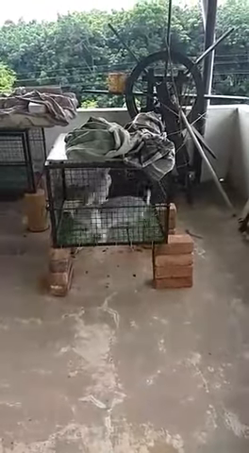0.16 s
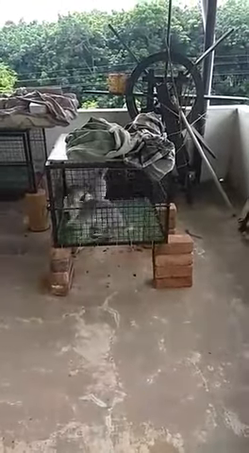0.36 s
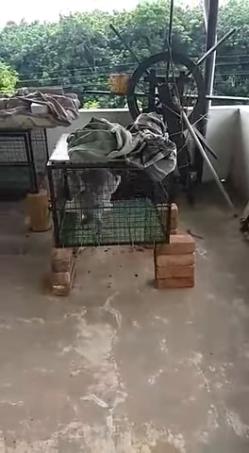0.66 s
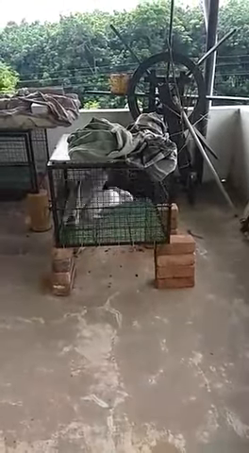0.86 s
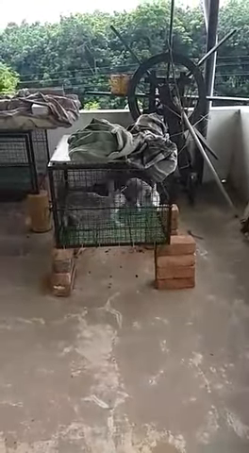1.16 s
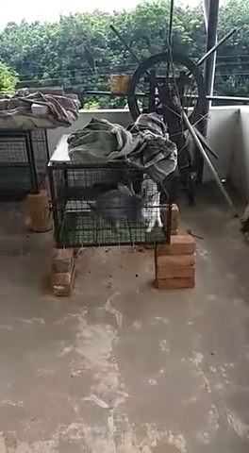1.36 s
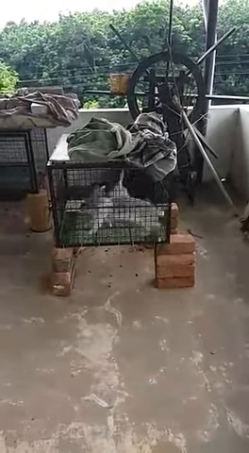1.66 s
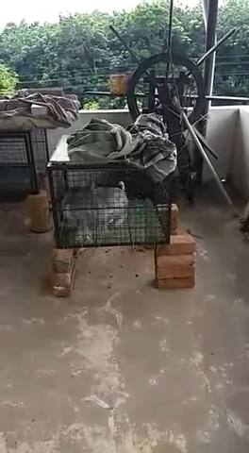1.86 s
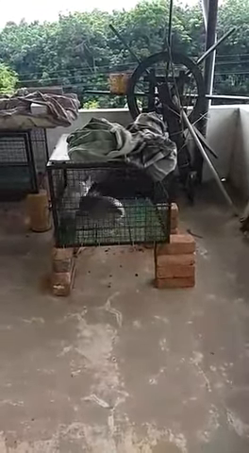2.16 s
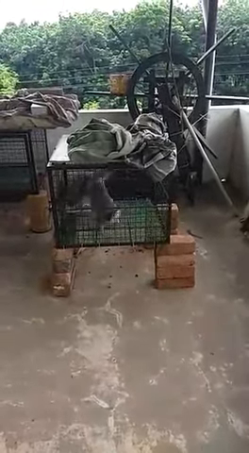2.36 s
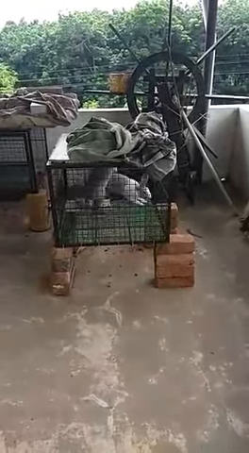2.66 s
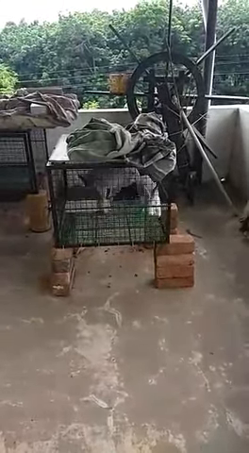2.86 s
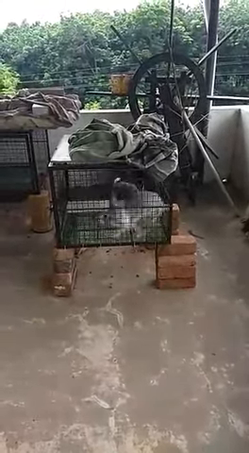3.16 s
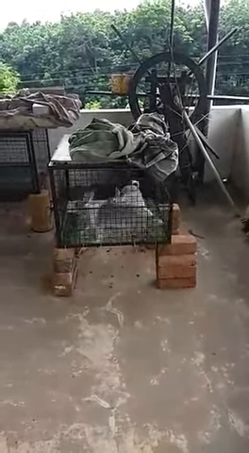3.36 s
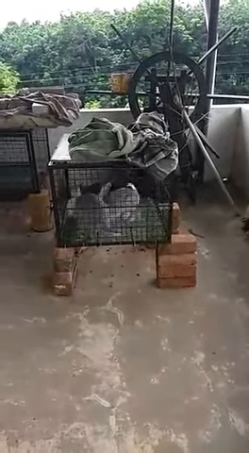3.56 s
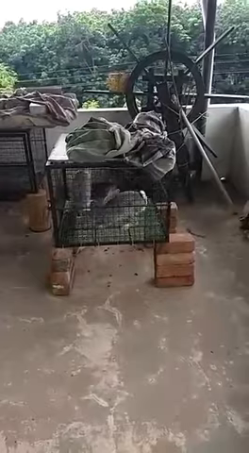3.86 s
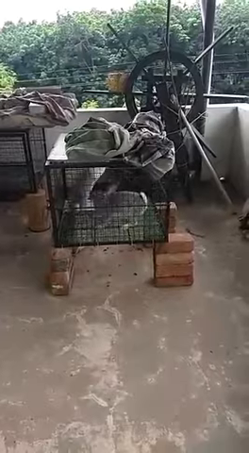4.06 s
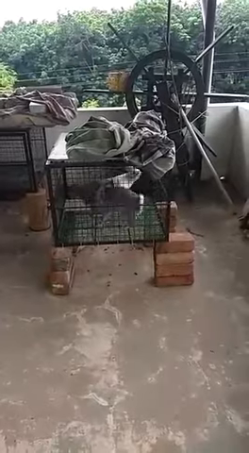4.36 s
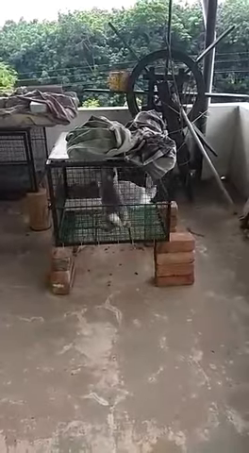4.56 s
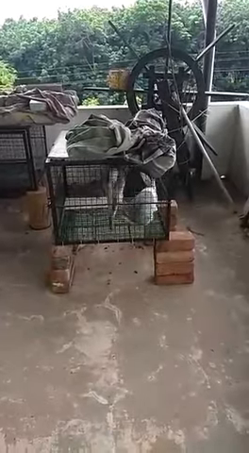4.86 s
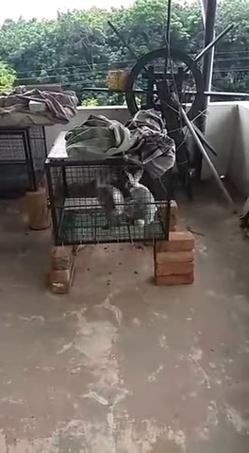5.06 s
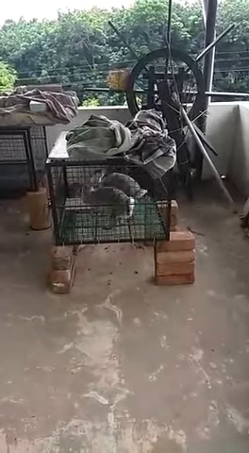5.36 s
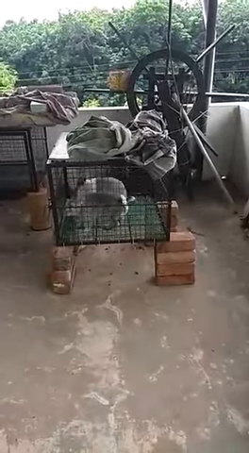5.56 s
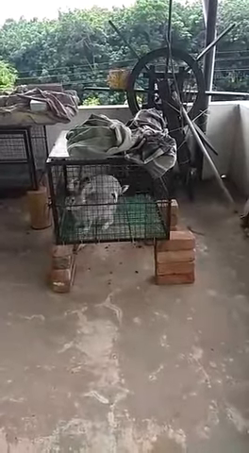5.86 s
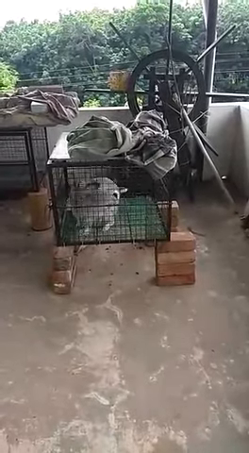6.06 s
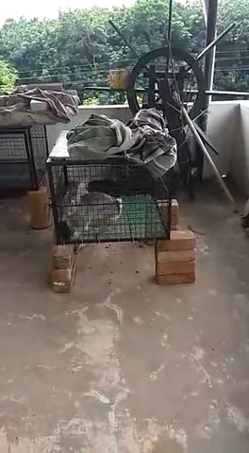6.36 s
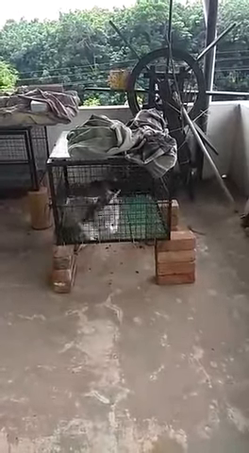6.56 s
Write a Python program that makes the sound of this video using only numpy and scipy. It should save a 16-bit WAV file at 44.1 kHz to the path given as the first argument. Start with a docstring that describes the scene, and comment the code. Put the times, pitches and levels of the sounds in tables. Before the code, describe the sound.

Fur brushes and claws scratch against wire as two rabbits tussle in a mesh cage. A sharp metallic crash comes about a second in and a louder one near three seconds, followed by smaller rattles, bright ticks and dull foot thumps. The microphone picks up a short echo from the roofed terrace, along with a soft outdoor hiss, a slow faraway engine and a faint tone that swells twice.

```python
"""On a roofed terrace, two rabbits scuffle in a wire mesh cage. Their bodies slam into the mesh, so it rattles
and its wires and frame ring. Claws tick and scratch on the wires, fur brushes past, and feet thump on the floor
grid. Floor, walls and roof echo it all. Behind it the open air hisses, a slow engine drones far off, and a
faint high hum of that engine swells twice."""
import sys
import numpy as np
from scipy import signal
from scipy.fft import rfft, irfft, next_fast_len
from scipy.io import wavfile
from scipy.ndimage import uniform_filter1d

SR = 44100
rng = np.random.default_rng(int(sys.argv[2]) if len(sys.argv) > 2 else 0)


def log_audio(samples):
    """Write samples as a 16-bit WAV file to the path given in sys.argv[1]."""
    # one column per channel
    frames = np.atleast_2d(samples).T
    # limit to full scale, then quantise
    limited = np.clip(frames, -1, 1)
    pcm = np.round(limited * 32767).astype(np.int16)
    wavfile.write(sys.argv[1], SR, pcm)


N = 295468
TOP_HZ = 13180  # the sound is cut off above this pitch
LEFT_LAG = 8  # samples by which the cage's sound reaches the left side later


def amp(db):
    """Turns decibels into a gain."""
    return 10 ** (np.asarray(db) / 20)


def unit(x):
    """Scales a sound to an average (rms) level of 1."""
    return x / np.sqrt(np.mean(x ** 2) + 1e-20)


def unit_energy(x):
    """Scales each channel to an energy of 1."""
    return x / np.linalg.norm(x, axis=-1, keepdims=True)


def levelled(sound, db, length):
    """Sets the average level of the first `length` seconds (at least 3 ms)."""
    return amp(db) * sound / np.sqrt(np.mean(sound[:, :int(max(length, .003) * SR)] ** 2))


def at_pitch(table, hz):
    """Looks up a pitch in a table, gliding between its rows."""
    f, value = np.transpose(table)
    return np.interp(np.log(hz + 1), np.log(f + 1), value)


def curves(table):
    """Turns each column of a time table into a value for every sample."""
    times, *columns = np.transpose(table)
    return [np.interp(np.arange(N) / SR, times, column) for column in columns]


def add(mix, start, sound):
    """Mixes in a stereo sound at `start` seconds."""
    part = mix[:, round(start * SR):][:, :sound.shape[1]]
    part += sound[:, :part.shape[1]]


def colour(x, db_at):
    """Turns each pitch up or down by db_at(hz) decibels."""
    size = next_fast_len(x.shape[-1] + 2048)
    gain = amp(db_at(np.fft.rfftfreq(size, 1 / SR) + 1))
    return irfft(rfft(x, size) * gain, size)[..., :x.shape[-1]]


def drift(top_hz):
    """A slow random wobble of average size 1."""
    t = np.arange(N // 256 + 2) * 256 / SR
    rates = np.geomspace(top_hz / 10, top_hz, 20)
    wobble = sum(np.sin(2 * np.pi * (f * t + rng.random())) / np.sqrt(f) for f in rates)
    return np.interp(np.arange(N) / SR, t, unit(wobble))


def dying_noise(ring_times):
    """Stereo noise in which each pitch has its own ring time (t60: the time to fade by 60 dB)."""
    hz, t, bands = signal.stft(rng.standard_normal((2, SR * 2 // 3)), SR, nperseg=256)
    fade = np.exp(-np.log(1000) * t / at_pitch(ring_times, hz)[:, None])
    return signal.istft(bands * fade, SR, nperseg=256)[1][:, :SR // 2]


def dying_tone(hz, t60, phase_turns=0):
    """One fading note of a struck object."""
    t = np.arange(SR // 2) / SR
    return unit_energy(np.exp(-np.log(1000) * t / t60) * np.sin(2 * np.pi * (hz * t + phase_turns)))


def snap():
    """A bare click straight from the cage, reaching the right side first."""
    click = np.zeros((2, SR // 2))
    click[0, LEFT_LAG] = click[1, 0] = 1
    return click


def contacts(length, per_s, spread_db, fade_power, first=0.082, rise_share=0.014):
    """A first touch, then a run of small uneven knocks that builds up and dies."""
    t = np.arange(int(2 * max(length, .002) * SR)) / SR
    chance, size, sign = rng.random((3, SR // 2))[:, :len(t)]
    clicks = (chance < per_s / SR) * amp(spread_db * (size - 3.0)) * np.sign(sign - .5)
    clicks *= 1 - np.exp(-t / (rise_share * length))
    clicks[0] = first
    return (clicks * np.exp(-(t / length) ** fade_power))[None]


def close_echoes(x, echo_db, count=5):
    """Close surfaces echo within 1 to 9 ms, giving each spot its own tone colour."""
    echoes = np.zeros((2, SR // 80))
    for delay, offset, sign in rng.random((count, 3)):
        left = int((.001 + .008 * delay) * SR)
        right = left + int(4 * offset)
        echoes[[0, 1], [left, right]] += np.sign(sign - .5) * amp(echo_db) / np.sqrt(count)
    echoes[:, 0] = 1
    return signal.oaconvolve(x, unit_energy(echoes), axes=1)[:, :x.shape[1]]


# tone colour of the open air: f/Hz, level/dB
AIR_COLOUR = [(15, -45), (30, -16), (60, -13), (95, -15.5), (130, 6.5), (220, 2), (310, 1.5), (385, 1.5),
              (470, -5), (750, -4.5), (2400, -5.5), (5500, -10), (9000, -9), (13000, -17.5)]
# how alike left and right are: f/Hz, likeness (1 = the same)
AIR_LIKENESS = [(100, 0.99), (300, 0.86), (600, 0.53), (1200, -0.29), (2500, -0.065), (5000, -0.11),
                (12000, 0.027)]
# how the air rises and ebbs, before the trims below: t/s, roar level/dB, hiss level/dB
AIR_LEVELS = [(0, -46, -31.5), (.6, -44, -37), (2.2, -41.5, -36.5), (3.7, -45, -41), (5.8, -45, -42),
              (6.7, -42.5, -44.5)]
def air(split_hz=1100, roar_trim_db=-1, hiss_trim_db=-3):
    """Open air: a low roar much alike on both sides, and a wide hiss that bounces off the walls."""
    left, other = rfft(rng.standard_normal((2, N)))
    hz = np.fft.rfftfreq(N, 1 / SR)
    likeness = np.clip(at_pitch(AIR_LIKENESS, hz), -1, 1)
    right = likeness * left + np.sqrt(1 - likeness ** 2) * other
    spectrum = np.array([left, right]) * amp(at_pitch(AIR_COLOUR, hz)) * (hz < TOP_HZ)
    low_share = 1 / (1 + (hz / split_hz) ** 4)
    roar, hiss = (unit(irfft(spectrum * np.sqrt(share), N)) for share in (low_share, 1 - low_share))
    hiss = unit(close_echoes(hiss, echo_db=-5))
    roar_db, hiss_db = curves(AIR_LEVELS)
    return roar * amp(roar_db + roar_trim_db) + hiss * amp(hiss_db + hiss_trim_db)


# swells of the distant tone: t/s, length/s, peak level/dB
TONE_SWELLS = [(3.997, 0.45, -46), (6.24, 0.39, -47)]
def far_tone(hz=382, waver=0.035):
    """A faint, slightly unsteady high hum of the far engine."""
    t = np.arange(N) / SR
    swell = sum(amp(db) * np.sin(np.pi * np.clip((t - start) / length, 0, 1))
                for start, length, db in TONE_SWELLS)
    pitch = hz * (1 + waver * drift(26))
    return swell * np.sin(2 * np.pi * np.cumsum(pitch) / SR)


# how often the engine fires: t/s, f/Hz
FIRING_RATE = [(0, 21.1), (.4, 20.2), (1, 20.2), (1.6, 19), (2.4, 23.1), (3.4, 18.8), (4.6, 19.55),
               (5.6, 24), (6.7, 22.6)]
# its main hums, at 7 and 8 times that rate: t/s, level/dB of the first, level/dB of the second
MAIN_HUMS = [(0, -40.5, -39), (.27, -43, -39.5), (.55, -45.5, -56), (1.4, -48.5, -53), (2.1, -66, -47),
             (3.5, -57, -51), (4.8, -47, -77), (6.7, -77, -59)]
# its weak hums: multiple of the firing rate -> level/dB relative to the louder main hum
WEAK_HUMS = {5: -21, 6: -28, 10: -8, 11: -32, 14: -26, 15: -18.5, 19: -14.5}
def engine(puff_db=-7, puff_band_hz=(86.3, 207.4), puff_fade_cycles=0.13):
    """A slow, far engine: its hums swell and fade on their way, and each firing gives a dull puff."""
    cycles = np.cumsum(curves(FIRING_RATE)[0]) / SR + rng.random()
    def hum(multiple, db):
        return amp(db) * np.sqrt(2) * np.sin(2 * np.pi * (multiple * cycles + 0.055 * drift(8.9)))
    levels = curves(MAIN_HUMS)
    strong = sum(hum(multiple, db) for multiple, db in zip((7, 8), levels))
    loudest_db = np.max(levels, axis=0)
    weak = sum(hum(multiple, loudest_db + db + 2.5 * drift(3)) for multiple, db in WEAK_HUMS.items())
    puffs = rng.standard_normal(N) * np.exp(-(cycles % 1) / puff_fade_cycles)
    puffs = unit(signal.sosfilt(signal.butter(1, puff_band_hz, "band", fs=SR, output="sos"), puffs))
    return strong + weak + puffs * amp(loudest_db + puff_db)


# how long the terrace echoes: f/Hz, ring time/s
TERRACE_ECHO = [(200, 0.83), (2000, 0.54), (6000, 0.6), (13000, 0.48)]
def terrace(x, echo_db=-10.5, build_s=0.041):
    """Floor, walls and roof throw the cage's noise back."""
    t = np.arange(SR // 2) / SR
    echo = dying_noise(TERRACE_ECHO) * (1 - np.exp(-(t / build_s) ** 2))
    return x + amp(echo_db) * signal.fftconvolve(x, unit_energy(echo), axes=1)[:, :N]


def spot_ring(count=70, t60=.045, band_hz=(2300, 13100)):
    """The short wires around a touched spot ring briefly, each at its own random pitch."""
    size = SR // 7
    spectrum = np.zeros((2, size // 2 + 1), complex)
    bins = (rng.uniform(*band_hz, count) * size / SR).astype(int)
    spectrum[:, bins] = rng.uniform(.3, 1, count) * np.exp(2j * np.pi * rng.random((2, count)))
    fade = np.exp(-np.log(1000) * np.arange(size) / SR / t60)
    return unit_energy(irfft(spectrum, size) * fade)


def rub_wire(slips, snap_db, echo_db):
    """Each slip on a wire gives a snap and a short ring, echoed by close surfaces."""
    ring = spot_ring()
    touch = ring + amp(snap_db) * snap()[:, :ring.shape[1]]
    return close_echoes(signal.fftconvolve(slips, touch, axes=1), echo_db)


# how loudly fur and paws brush the mesh: t/s, level/dB
BRUSH_LEVEL = [(0, -37), (.6, -38), (1.4, -40.5), (1.85, -42), (2.3, -38), (3.7, -44), (4.6, -42.5),
               (5.7, -44), (6.7, -41.5)]
def brushing(count=120, low_cut_hz=1600):
    """Fur and paws keep brushing the mesh in faint dry scuffs, each at another spot."""
    out = np.zeros((2, N))
    for k, (when, span, softness) in enumerate(rng.random((count, 3))):
        length = .025 + .07 * span
        slips = contacts(length, per_s=500, spread_db=24, fade_power=4, first=.004, rise_share=.15)
        scuff = rub_wire(slips, snap_db=-2, echo_db=6)
        add(out, (k + when) * N / SR / count, levelled(scuff, -6 * softness, length))
    out = colour(out, lambda hz: -20 * np.log10(1 + (low_cut_hz / hz) ** 2) - 60 * (hz > TOP_HZ))
    return unit(out) * amp(curves(BRUSH_LEVEL)[0])


# notes of the floor grid: f/Hz, level/dB, ring time/s
GRID_NOTES = [(140, 5.5, 0.12), (169, -10, 0.46), (272, 3, 0.84), (351, 6, 0.17), (447, -14, 0.25),
              (690, 0, 0.088), (807, -16, 0.16)]
# feet and rumps landing on it: t/s, level/dB, length/s, f/Hz of the boom
LANDINGS = [(0.835, -34, 0.025, 340), (1.275, -43, 0.057, 355), (1.484, -38, 0.016, 740),
            (1.519, -46.5, 0.036, 150), (1.994, -43, 0.13, 200), (2.753, -25.5, 0.021, 359),
            (2.921, -38.5, 0.13, 320), (4.536, -41, 0.0076, 150), (4.72, -42, 0.1, 275),
            (6.52, -50, 0.02, 162)]
def thumps(thud_db=4, boom_db=9, low_cut_hz=105):
    """Soft feet push the floor grid: a boom, low notes and a thud. The open grid gives no deep bass."""
    thud_band = signal.butter(3, [130, 900], "band", fs=SR, output="sos")
    thud = signal.sosfilt(thud_band, snap() + .5 * unit_energy(dying_noise([(500, 0.3)])))
    grid = sum(amp(db) * dying_tone(hz, t60) for hz, db, t60 in GRID_NOTES)
    grid = grid + amp(thud_db) * unit_energy(thud)
    out = np.zeros((2, N))
    for start, db, length, hz in LANDINGS:
        floor = grid + amp(boom_db) * dying_tone(hz, t60=0.07)
        pushes = contacts(length, per_s=1000, spread_db=11, fade_power=1.7)
        add(out, start, levelled(signal.fftconvolve(pushes, floor, axes=1), db, length))
    return signal.sosfilt(signal.butter(4, low_cut_hz, "high", fs=SR, output="sos"), out)


def claw_colour(x, lows_db, centre_hz=12400, width_octaves=0.79):
    """Claw on wire sounds bright: a high band stays, and lower pitches sink towards lows_db."""
    def db_at(hz):
        bump = np.exp(-.5 * (np.log2(hz / centre_hz) / width_octaves) ** 2)
        return lows_db * (1 - bump) - 60 * (hz > TOP_HZ)
    return colour(x, db_at)


# claw tips striking a wire: t/s, level/dB
CLAW_TICKS = [(0.189, -33), (0.452, -39), (0.809, -23), (1.325, -27), (1.41, -31), (1.505, -34),
              (1.546, -26.5), (1.656, -30.5), (1.918, -29), (2.285, -40), (3.02, -24), (4.38, -28),
              (4.52, -29), (4.587, -28), (4.688, -32), (4.831, -38), (4.9637, -20), (5.002, -26),
              (5.085, -32), (5.186, -30), (5.199, -28), (6.254, -40), (6.284, -27), (6.498, -40),
              (6.547, -38), (6.618, -35), (6.683, -38)]
def ticks():
    """A claw tip hits one wire: a tiny burst of noise and a small clink."""
    out = np.zeros((2, N))
    for start, db in CLAW_TICKS:
        tick = unit_energy(dying_noise([(1000, .015)]))
        add(tick, 0, .5 * spot_ring(count=24, t60=0.14))
        add(out, start, levelled(claw_colour(tick, lows_db=-22), db, length=.003))
    return out


# claws dragged along the wires: t/s, level/dB, length/s, level/dB of the lows against the highs
CLAW_STROKES = [(0.367, -35, 0.039, -4), (0.738, -36, 0.019, -26), (0.805, -23.5, 0.06, -10.5),
                (1.128, -32.5, 0.071, -2), (1.324, -34, 0.037, -21), (1.985, -39, 0.06, -20),
                (2.965, -28.5, 0.039, -14), (3.28, -33.5, 0.056, -6), (3.571, -34.5, 0.029, -11),
                (3.628, -37, 0.038, -22), (4.52, -36.5, 0.14, -11), (4.665, -30.5, 0.041, -5),
                (4.719, -31, 0.049, -25), (4.82, -32, 0.041, -14), (4.98, -33, 0.028, -30),
                (5.185, -32.5, 0.036, -21), (6.251, -36.5, 0.069, -19), (6.437, -38.5, 0.055, -15),
                (6.488, -36, 0.042, -14), (6.569, -39, 0.067, -22), (6.614, -37, 0.038, -21),
                (6.669, -34, .076, -9)]
def scratches():
    """A claw sticks and slips along a wire: a dry run of fine ticks."""
    out = np.zeros((2, N))
    for start, db, length, lows_db in CLAW_STROKES:
        slips = contacts(length, per_s=700, spread_db=22, fade_power=3, first=.006, rise_share=.06)
        stroke = rub_wire(slips, snap_db=-1, echo_db=4)
        add(out, start, levelled(claw_colour(stroke, lows_db), db, length))
    return out


# notes of the cage's frame, main note first: f/Hz, level/dB, ring time/s
FRAME_NOTES = [(981, 11.5, 0.21), (348, 1, 0.38), (1252, 9.5, 0.29), (1227, 15, 0.14), (1769, 20, 0.058)]
# blows that ring it: t/s, level/dB, rise/s, change/dB of the other notes
HARD_BLOWS = [(0.893, -35, 0.044, -8.5), (2.751, -32, 0.02, -2.5)]
def frame():
    """The frame takes up the two hardest blows slowly and rings out."""
    lag_s = np.array([[LEFT_LAG / SR], [0]])
    main, *others = (amp(db) * dying_tone(hz, t60, -hz * lag_s) for hz, db, t60 in FRAME_NOTES)
    out, t = np.zeros((2, N)), np.arange(SR // 2) / SR
    for start, db, rise, others_db in HARD_BLOWS:
        ring = (main + amp(others_db) * sum(others)) * (1 - np.exp(-t / rise))
        add(out, start, levelled(ring, db, length=0.34))
    return out


# notes of the mesh's long wires: f/Hz, level/dB
WIRE_NOTES = [(2322, 3), (2550, 0), (2678, 2), (2800, -2), (2922, 4.5), (3020, -1), (3430, 0), (3577, 3),
              (4355, 0), (4480, -1), (4735, 4), (5060, 1), (5270, -3), (5500, 7.5), (5905, 1), (6200, 0),
              (6420, 0), (6620, -5), (6790, -4), (7230, -4), (7450, -5), (7849, 0), (8140, -1), (8280, 1),
              (8420, -2), (8676, -1), (8950, -3), (9213, 2), (9720, -3), (9950, -3), (10500, -3),
              (10800, -4), (11200, -5), (11640, -5), (12300, -5)]
def singing_wires(blur_hz=30):
    """All the long wires ring together; loose joints make each note wander, the weak ones most."""
    out = np.zeros((2, N))
    for hz, db in WIRE_NOTES:
        width_hz = blur_hz * amp(-db / 2)
        slack = uniform_filter1d(rng.standard_normal(N), SR // 200)
        wander = np.cumsum(slack) * np.sqrt(2 * np.pi * width_hz / SR)
        phase = 2 * np.pi * hz * np.arange(N) / SR + wander
        # as the struck spot moves, each note shifts in strength and in left-right timing
        apart = 1.2 * drift(9)
        out += amp(db + 3.5 * drift(16)) * np.sin(phase + np.array([apart, -apart]))
    return unit(out)


def patch_colour(x, tilt_db, low_cut_hz):
    """The smaller the patch of mesh that moves, the less bass it gives off."""
    def db_at(hz):
        slope = tilt_db * np.log2(np.clip(hz, 800, TOP_HZ) / TOP_HZ)
        return slope - 60 * (hz > TOP_HZ) - 10 * np.log10(1 + (low_cut_hz / hz) ** 6)
    return colour(x, db_at)


# tone colour of the mesh's countless small vibrations: f/Hz, level/dB
MESH_COLOUR = [(200, 3), (600, 11.5), (1500, 14.5), (2100, 16), (2750, 6.5), (3230, -3), (3550, 15),
               (3950, -6), (4450, 9), (5150, 2.5), (5500, 4.5), (6500, -0.5), (7050, -0.5), (8100, -0.5),
               (13000, -0.5)]
# how long they last: f/Hz, ring time/s
MESH_RING_TIMES = [(300, 0.45), (2000, 0.27), (6000, 0.019), (13000, 0.11)]
# bodies hitting the mesh: t/s, level/dB, length/s, brightness/(dB per octave), rise/s,
# f/Hz of the low cut, level/dB of the long wires against the chatter
BODY_SLAMS = [(0.806, -32, 0.027, 3.5, .0007, 2400, -14), (0.872, -30.5, 0.015, -1.5, 0.008, 2000, -8),
              (0.890, -14.5, 0.02, -0.5, 0.0044, 1690, 8), (0.943, -25.5, 0.043, 3, 0.0053, 1490, -9),
              (1.971, -31, 0.055, 4.5, 0.0015, 799, -4), (2.596, -31, 0.081, 5.5, 0.0028, 892, -10),
              (2.69, -27, 0.012, 3, 0.0056, 3400, -5), (2.714, -25, 0.0059, -12, 0.0017, 3805, 11),
              (2.7468, -10.5, 0.008, 3.5, 0.002, 300, 6.5), (2.767, -16.5, 0.018, 4.5, 0.0051, 500, 5),
              (2.812, -21.5, 0.017, -1, 0.0044, 2200, 5), (2.908, -30.5, .03, 5, .006, 2982, -5),
              (3.01, -20, 0.007, 1, 0.0003, 2806, 1.5), (3.031, -29, 0.054, 2.5, 0.0042, 2400, -6),
              (3.981, -31.5, 0.023, 4, 0.0088, 1200, -9), (4.379, -35, .006, 11, 0.00087, 3000, -3),
              (4.397, -37, 0.022, 2, 0.0068, 1795, -4), (4.639, -26.5, 0.0096, 1.5, 0.0009, 2600, -9),
              (4.719, -28, 0.00541, 3, 0.0005, 900, -12), (4.734, -33, 0.0055, 3.5, .0007, 1200, -4),
              (6.229, -34, 0.033, 6.5, 0.0034, 2000, -11), (6.484, -41.5, .047, -0.5, 0.0083, 800, -2)]
def clanks(snap_db=-4, jangle_db=7, wire_t60=.11):
    """A blow makes the mesh chatter against its frame: close wires jangle and long wires sing."""
    out, t = np.zeros((2, N)), np.arange(SR // 2) / SR
    wires = np.pad(singing_wires(), ((0, 0), (0, SR)))
    wash = unit_energy(dying_noise(MESH_RING_TIMES))
    energy_kept = np.exp(-2 * np.log(1000) / wire_t60 / SR)  # per sample
    # each landing on the floor also shakes the mesh, dully (same columns as BODY_SLAMS)
    shakes = [(start, db + 3.5, length, 0, 0.0071, 350, -25) for start, db, length, _ in LANDINGS]
    for start, db, length, tilt_db, rise, low_cut_hz, sing_db in BODY_SLAMS + shakes:
        touches = contacts(length, per_s=1100, spread_db=15, fade_power=3,
                           first=.08 * np.exp(-rise / .003), rise_share=rise / length)
        jangle = wash + amp(snap_db) * snap()
        add(jangle, 0, amp(jangle_db) * spot_ring(count=64, t60=.11))
        chatter = signal.fftconvolve(touches, close_echoes(jangle, echo_db=4), axes=1)[:, :len(t)]
        chatter = colour(chatter, lambda hz: at_pitch(MESH_COLOUR, hz))
        # each touch adds energy to the long wires, and it leaks away
        energy = signal.lfilter([1], [1, -energy_kept], np.pad(touches[0] ** 2, (0, len(t))))[:len(t)]
        singing = np.sqrt(energy) * wires[:, round(start * SR):][:, :len(t)]
        blow = levelled(chatter, 0, length) + levelled(singing, sing_db, length)
        add(out, start, levelled(patch_colour(blow, tilt_db, low_cut_hz), db, length))
    return out


def scene():
    """The cage on its terrace, with the engine, its faint high hum and the air behind it."""
    cage = clanks() + frame() + scratches() + ticks() + thumps() + brushing()
    return terrace(cage) + engine() + air() + far_tone()


# the right side is dull at the very top: f/Hz, level/dB
RIGHT_DULLING = [(9500, 0.5), (10300, -6), (10800, -1.5), (11400, -38), (11900, -6), (13000, -13)]
# both sides get a little extra treble: f/Hz, level/dB
TREBLE_LIFT = [(9500, 0), (11500, 3), (13000, 0)]
def record(dry, ceiling=.95):
    """Shapes the treble, gently squashes the loudest peaks and cuts off the highest pitches."""
    right = colour(dry[1], lambda hz: at_pitch(RIGHT_DULLING, hz))
    stereo = colour(np.array([dry[0], right]), lambda hz: at_pitch(TREBLE_LIFT, hz))
    squashed = stereo / (1 + (stereo / ceiling) ** 6) ** (1 / 6)
    top_cut = signal.firwin(511, TOP_HZ, window=("kaiser", 8), fs=SR)
    return signal.oaconvolve(squashed, top_cut[None], "same")


dry = scene()
out = record(dry)
log_audio(out)
```